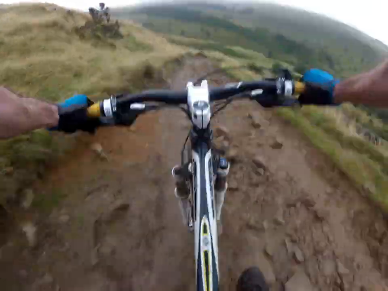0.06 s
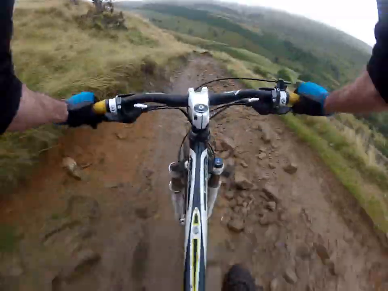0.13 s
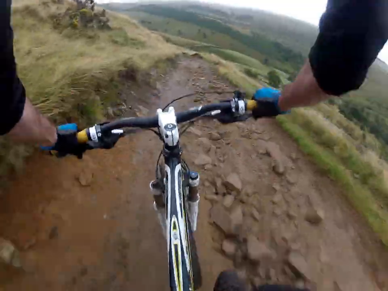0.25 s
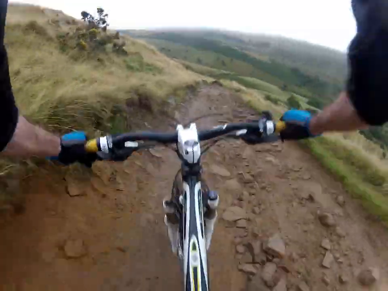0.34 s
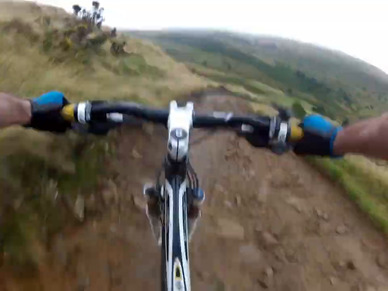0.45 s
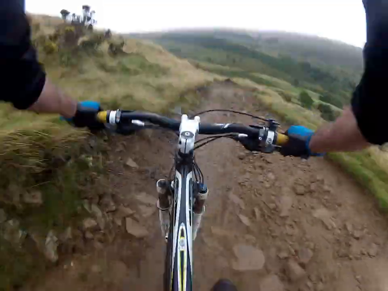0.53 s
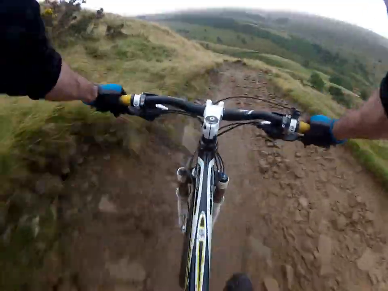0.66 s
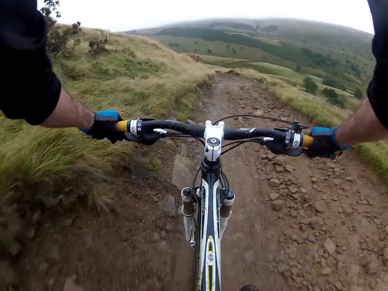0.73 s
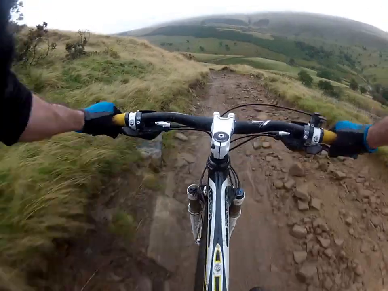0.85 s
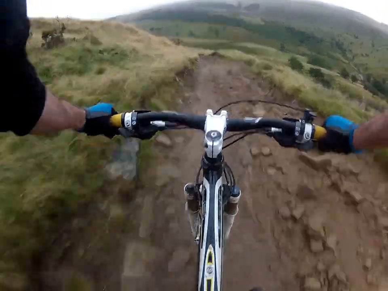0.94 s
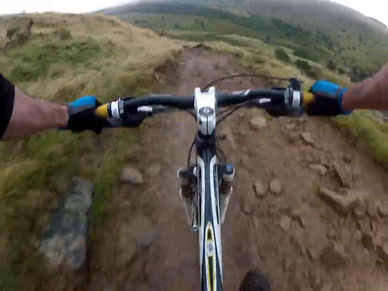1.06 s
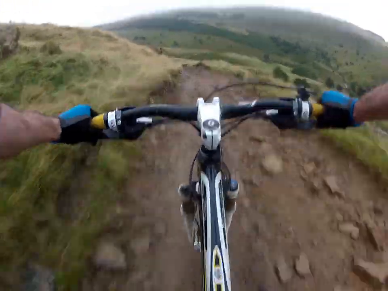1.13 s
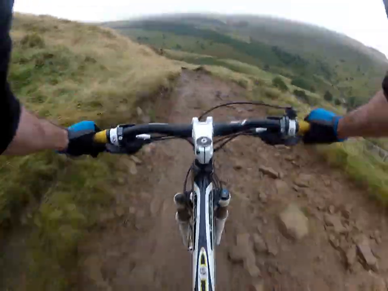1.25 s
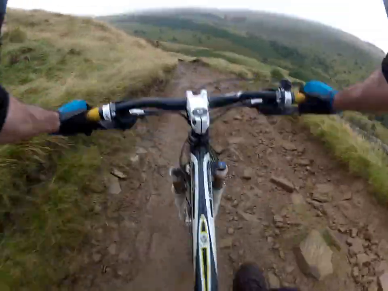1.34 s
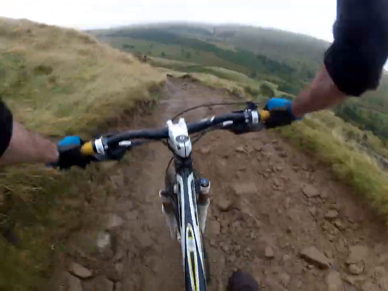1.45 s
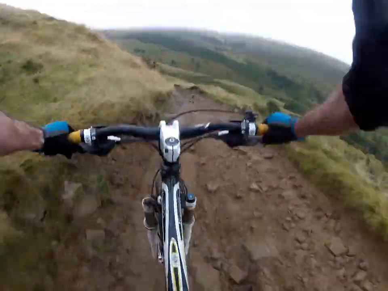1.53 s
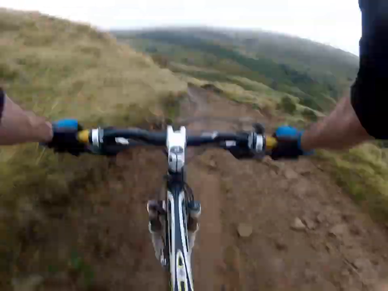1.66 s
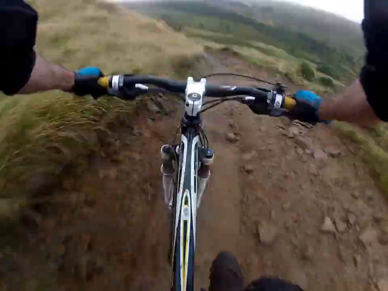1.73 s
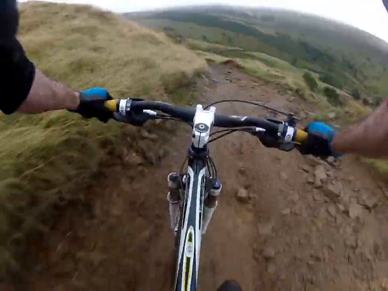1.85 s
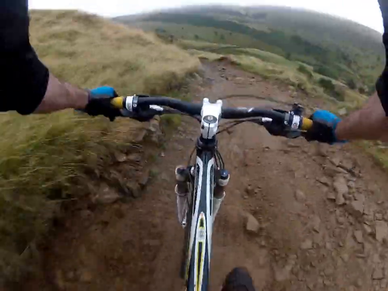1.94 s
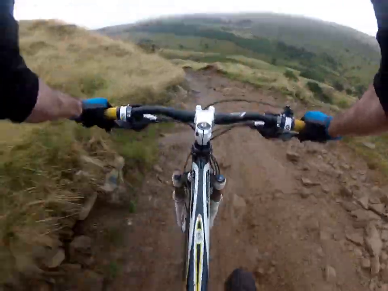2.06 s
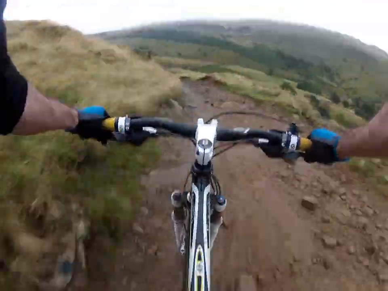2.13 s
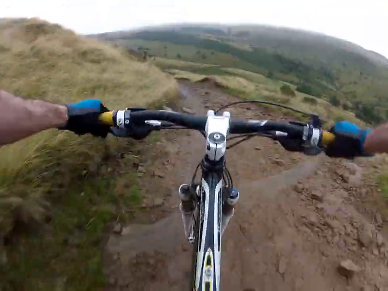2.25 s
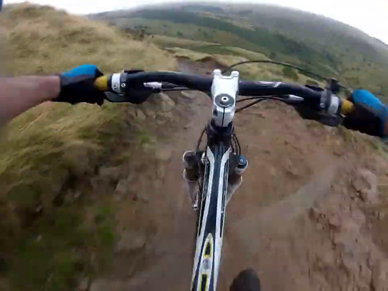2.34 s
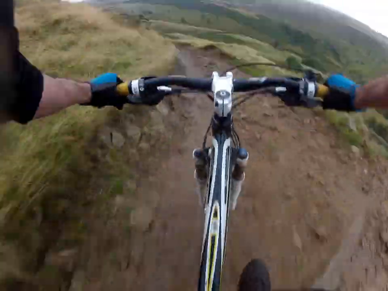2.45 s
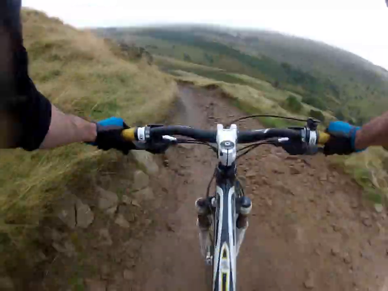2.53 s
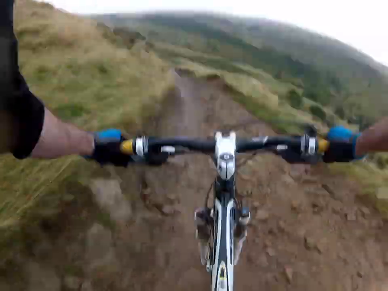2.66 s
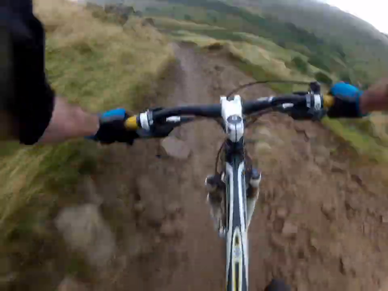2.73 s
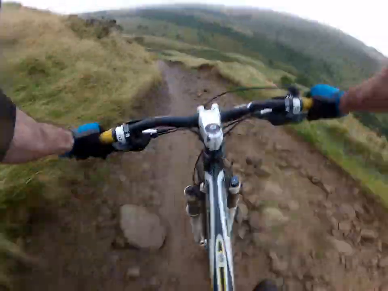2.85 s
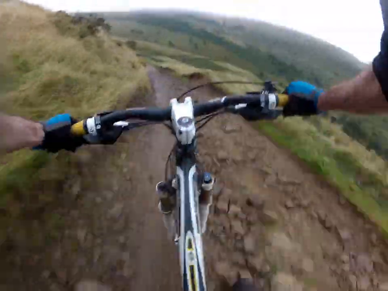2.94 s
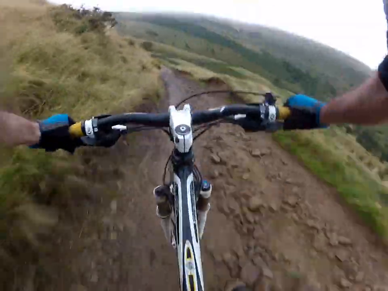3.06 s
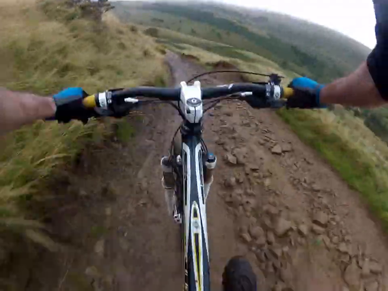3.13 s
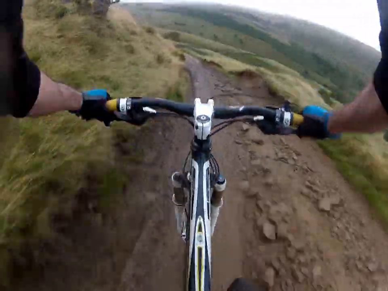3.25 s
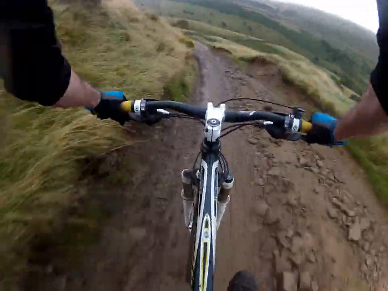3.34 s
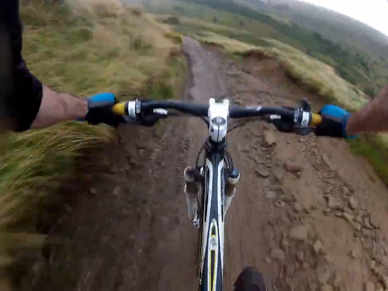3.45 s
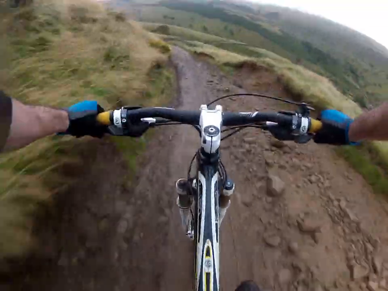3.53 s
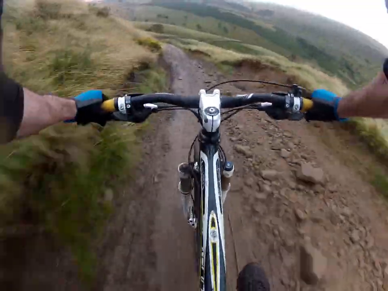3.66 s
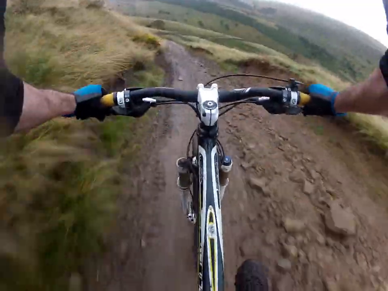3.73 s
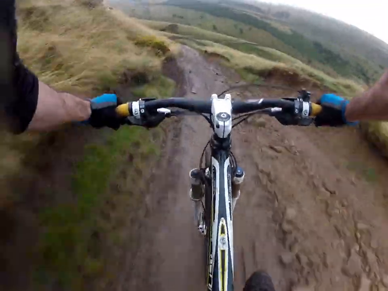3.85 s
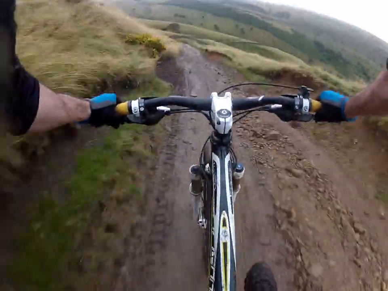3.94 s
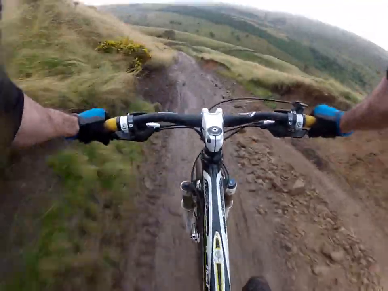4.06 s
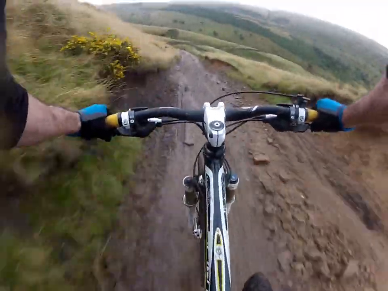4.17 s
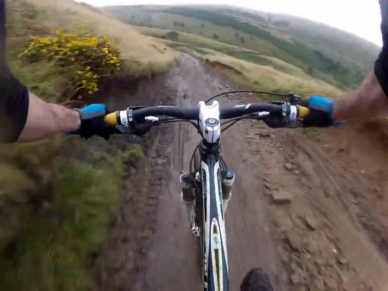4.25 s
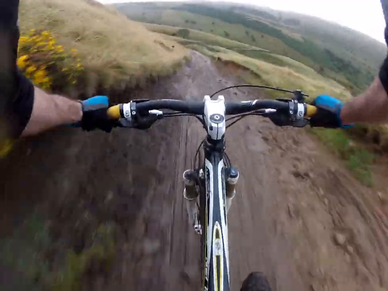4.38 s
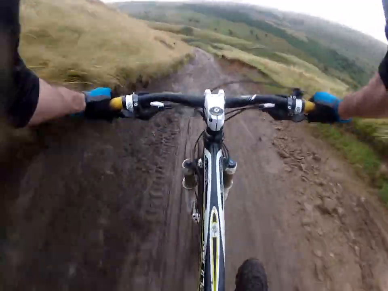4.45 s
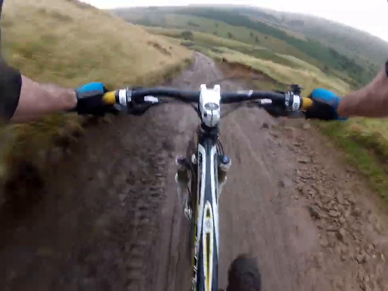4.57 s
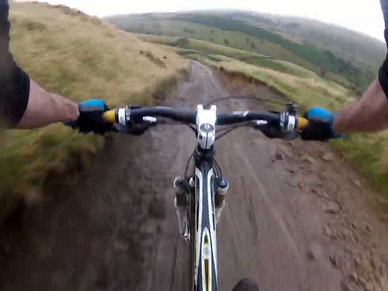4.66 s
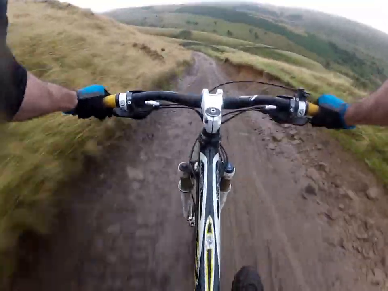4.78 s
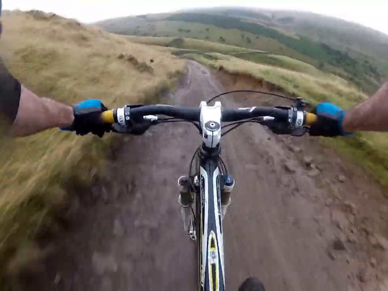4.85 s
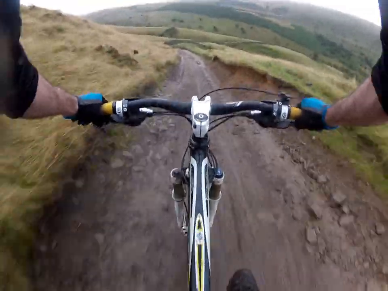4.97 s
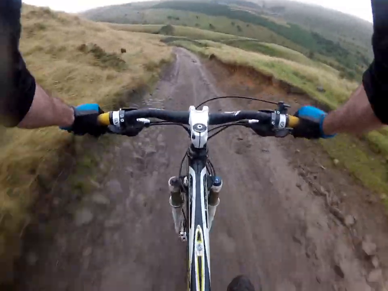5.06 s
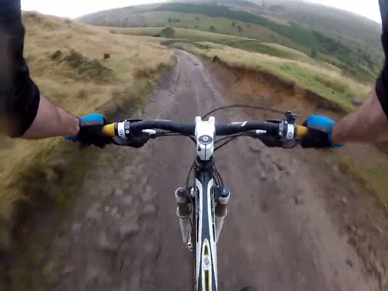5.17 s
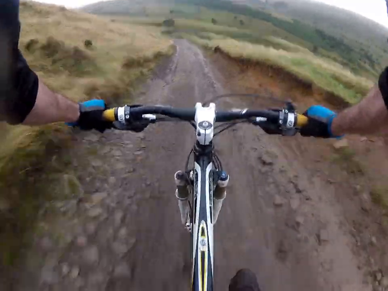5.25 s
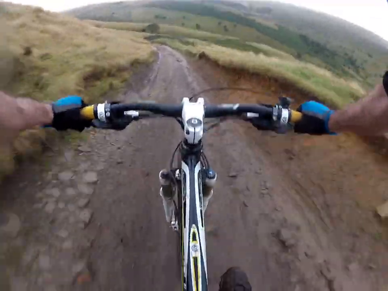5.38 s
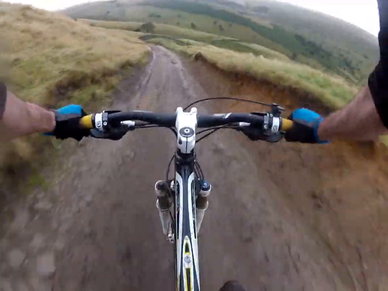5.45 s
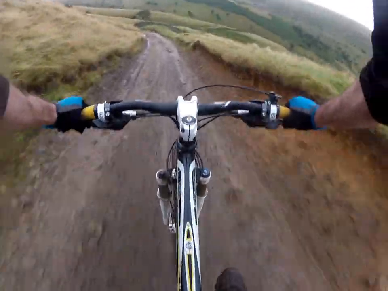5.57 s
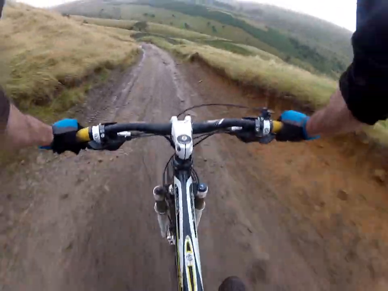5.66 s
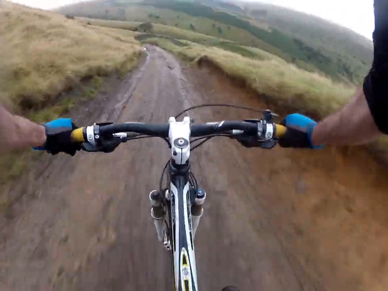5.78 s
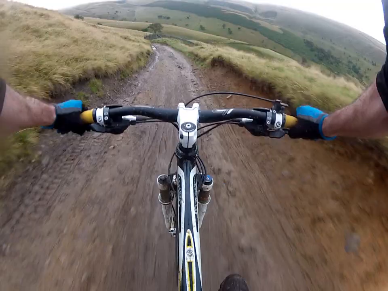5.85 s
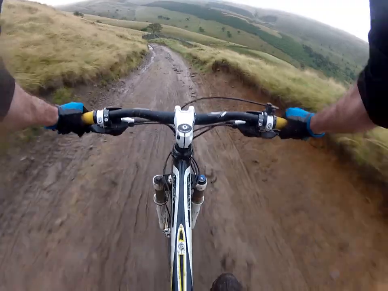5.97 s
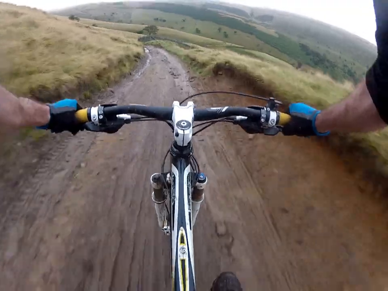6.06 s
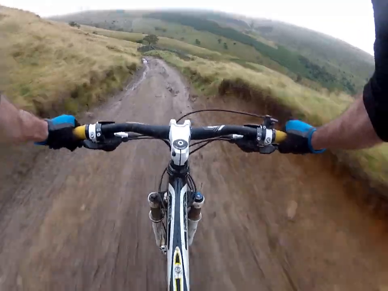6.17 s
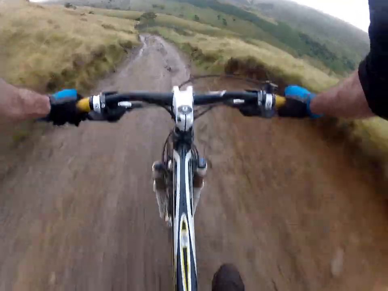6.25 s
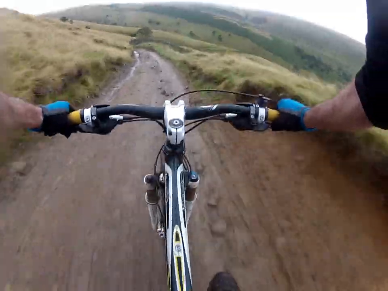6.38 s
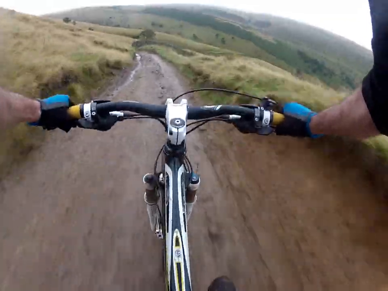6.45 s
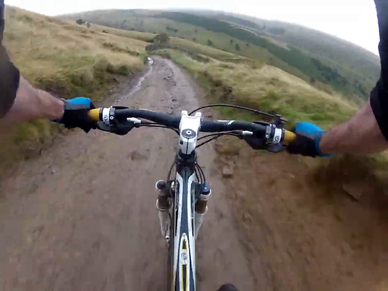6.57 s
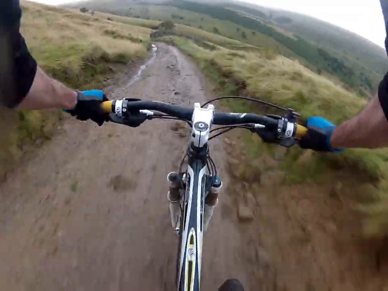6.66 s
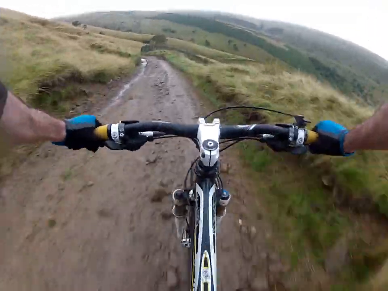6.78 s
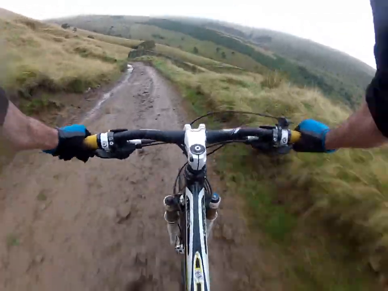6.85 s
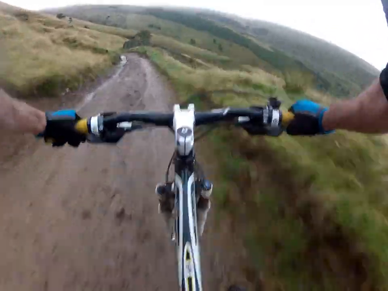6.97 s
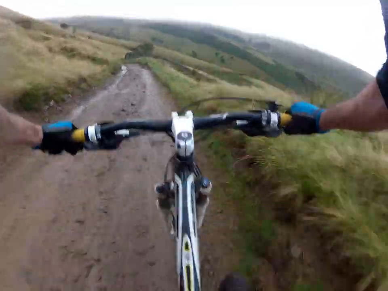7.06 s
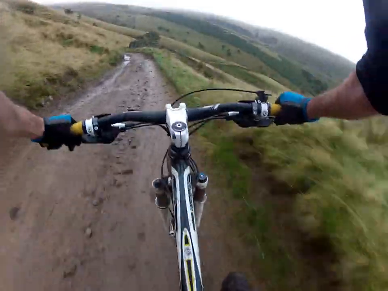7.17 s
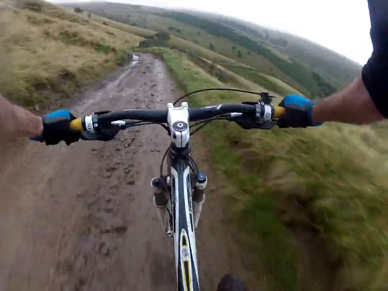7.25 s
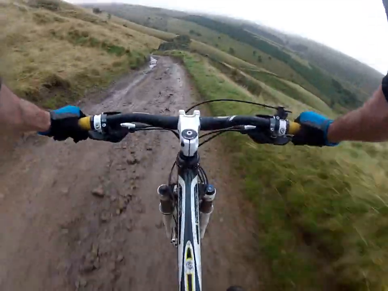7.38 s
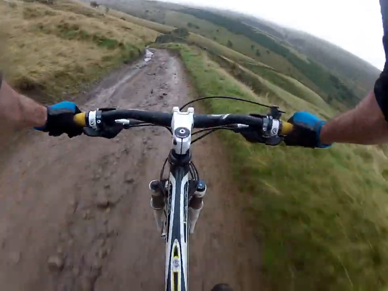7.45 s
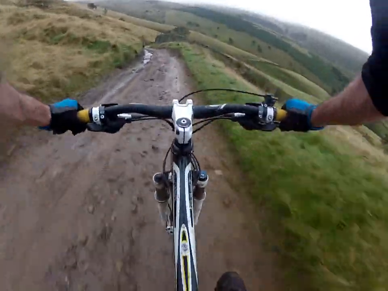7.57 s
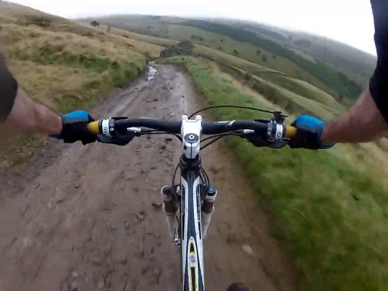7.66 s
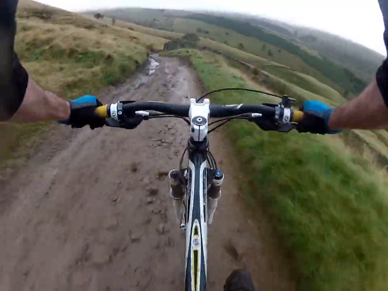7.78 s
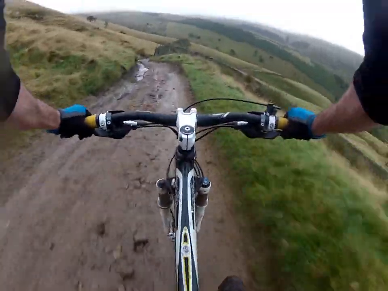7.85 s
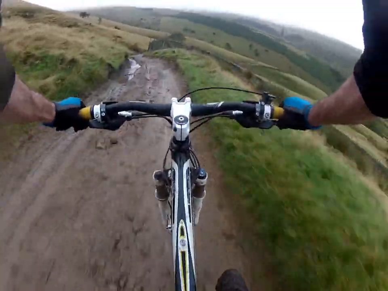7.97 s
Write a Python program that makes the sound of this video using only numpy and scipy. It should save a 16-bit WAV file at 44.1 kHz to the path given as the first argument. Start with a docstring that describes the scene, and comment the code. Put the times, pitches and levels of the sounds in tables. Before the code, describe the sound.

A bicycle races down a rocky dirt track, heard from a camera in a plastic case on the bike or rider. A hard overloaded knock opens it; dense thuds, clacks and rattles follow for nearly three seconds over crunching grit and rumbling tyres. Then the ground smooths, leaving low wind, faint tyre hiss, occasional bumps, and a couple of sharp stone clicks near the end.

```python
"""First a hard knock and a heave that overloads the microphone: a bike runs fast down a stony dirt track.
Bumps heave a camera in a plastic case (a lopsided swing of pressure) and make its mount thud (damped sines),
its shell clack (short modes) and chatter (bursts of grains). Grit crunches as filtered grains and noise;
hard parts click and pebbles snap (short decays). Filtered noise makes the wind and tyre rumble underneath;
on damp stretches the tyres hiss, and a small metal part sings faintly."""
import sys
import numpy as np
from scipy import signal
from scipy.fft import rfft, irfft, next_fast_len
from scipy.io import wavfile
from scipy.ndimage import map_coordinates

SR = 44100
rng = np.random.default_rng(int(sys.argv[2]) if len(sys.argv) > 2 else 0)


def store_wav(level_fs):
    """Save 16-bit WAV to argv[1]."""
    pcm = np.round(np.clip(np.atleast_2d(level_fs), -1, 1) * 32767)
    wavfile.write(sys.argv[1], SR, pcm.T.astype(np.int16))


N = 353241

# rocks that knock the case and then heave the camera; relative levels:
# t/s, rattle level/dB, thud level/dB, thud f/Hz, heave level/dB
ROCKS = [(.037, -22, -9, 117, 8), (0.4, -30.5, -9.5, 131, -1), (0.555, -25.5, -11, 117, -0.5),
         (.674, -23, -6, 118, 1), (.923, -28.5, -21, 166, -4.5), (1.055, -33.5, -17.5, 127, -4),
         (1.223, -25.5, -3.5, 164, 5), (1.616, -20, -8, 161, 5), (1.76, -24, -7.5, 125.5, -1),
         (2.095, -31, -12, 111, 2), (2.456, -26.5, -7.5, 127, 1.5), (2.611, -23.5, -3.5, 112, 5.5),
         (2.737, -28, -14.5, 123, 2), (3.487, -31, -17, 132, -7.5), (4.482, -37, -22, 194, -11),
         (4.61, -29.5, -15.5, 135, 0.5), (5.289, -26.5, -11, 122, -10.5), (6.257, -31, -12.5, 134, 0),
         (7.092, -30, -16.5, 176, -3.5)]
# hollows that heave the camera without a knock and press the tyres into the grit:
# t/s, relative heave level/dB, crunch level/dB
HOLLOWS = [(.822, -13, -55), (1.391, -19, -46), (1.517, -4, -39.5), (2.222, -3.5, -39), (2.353, -14, -36.5),
           (2.863, -8, -58), (2.943, -8, -56), (3.026, -5.5, -39.5), (3.166, -17, -44), (4.748, -11, -46),
           (4.961, -16.5, -46), (5.886, -14.5, -46), (6.026, -16, -45), (6.988, -4.5, -41.5),
           (7.196, -13, -70), (7.367, -15, -43)]
# source spectrum of grit and pebbles: f/Hz, relative spectral density level/dB
CRUNCH_SPECTRUM = [(150, -34), (450, -2.5), (700, 1), (1100, 2.5), (1700, 0.5), (3000, -7), (4500, -14),
                   (7000, -20), (10000, -13.5), (13000, -22.5), (15000, -16.5)]


def amp(db):
    """Level to amplitude: 20 dB is a factor of ten."""
    return 10 ** (np.asarray(db) / 20)


def unit(x):
    """Normalisation by the root mean square: scale to rms 1."""
    return x / np.sqrt(np.mean(x ** 2) + 1e-20)


def along(points, hz):
    """Interpolation on a logarithmic frequency axis, through (f/Hz, level/dB) points."""
    f, v = np.transpose(points)
    return np.interp(np.log(hz + 1), np.log(f + 1), v)


def wobble(rate):
    """Slow random modulation: a smooth curve through random knots, rate of them a second."""
    return map_coordinates(rng.standard_normal(8192), [np.arange(N) * rate / SR], mode="wrap")


def coloured(x, gain_db, size=16384):
    """Minimum-phase filtering: folding the cepstrum gives a causal filter of the given dB response."""
    log_gain = np.log(np.maximum(amp(gain_db(np.fft.rfftfreq(size, 1 / SR))), 1e-6))
    cepstrum = irfft(log_gain)
    cepstrum[1:size // 2] *= 2
    cepstrum[size // 2 + 1:] = 0
    impulse_response = irfft(np.exp(rfft(cepstrum)))
    return signal.fftconvolve(x, impulse_response)[:len(x)]


def cased(x, spectrum):
    """Source and transmission: a source spectrum is multiplied by the resonances of the case."""
    # peaks and dips of the camera case: f/Hz, width/Hz, level/dB
    resonances = [(700, 110, 2), (1070, 100, 4), (1320, 90, 4), (1570, 140, -2), (1890, 130, 7),
                  (2400, 130, 3), (3520, 300, 6), (4220, 200, -4), (4800, 330, 4), (6000, 220, -12),
                  (7150, 280, 4), (7750, 220, -3), (8480, 240, 5), (10080, 160, 7), (10430, 130, -6),
                  (10930, 150, 3), (11480, 200, -8), (12020, 130, 4), (12500, 200, -10), (13080, 130, 3),
                  (13480, 130, -5), (13880, 150, 5)]

    def response_db(hz):
        case_db = sum(db * np.exp(-((hz - centre) / width) ** 2) for centre, width, db in resonances)
        return along(spectrum, hz) + case_db

    return coloured(x, response_db)


def add(track, s, sound):
    """Superposition: mix a sound into the track from time s."""
    start = round(s * SR)
    part = sound[max(-start, 0):N - start]
    track[max(start, 0):][:len(part)] += part


def grains(rate, spread_db):
    """Shot noise: random tiny impacts of uneven size and sign, rate of them a second, rms 1."""
    sizes = amp(spread_db * np.minimum(rng.exponential(size=N), 4)) * rng.choice([-1, 1], N)
    struck = rng.random(N) < rate / SR
    return unit(sizes * struck)


def swells(rows, width):
    """Gaussian envelopes: one soft hump of amplitude at each (t/s, level/dB) row; width in s."""
    track, t = np.zeros(N), np.arange(-SR // 20, SR // 20) / SR
    for s, db in rows:
        add(track, s + t[0], amp(db) * np.exp(-(t / width) ** 2))
    return track


def ground_db():
    """Roughness of the ground drives the contact noise: a crunch level for every sample."""
    # how stony the ground is: t/s, crunch level/dB
    ground = [(0, -47.5), (.5, -45.5), (.85, -49.5), (1.2, -51), (1.6, -42.5), (1.95, -48.5), (2.35, -47.5),
              (2.62, -42.5), (3.2, -51.5), (3.75, -55.5), (4.4, -53), (4.62, -50.5), (4.9, -54),
              (6.0, -53.5), (6.7, -51), (7.0, -48), (7.25, -52), (8.0, -52)]
    return np.interp(np.arange(N) / SR, *np.transpose(ground))


def stone_patches(count=16, over_ground_db=7.5, spread_db=2.5, crunch_lead=.01):
    """Uneven excitation: loose stones at set times, in hollows and here and there: (t/s, level/dB)."""
    # patches of loose stones at set times: t/s, level/dB
    stone_places = [(.34, -42), (.415, -32), (1.28, -37), (1.665, -39.5), (1.745, -39), (1.96, -42),
                    (2.41, -44), (2.555, -34.5), (2.68, -35), (2.79, -39), (3.095, -40.5), (4.13, -46),
                    (4.39, -47.5), (5.585, -50.5), (7.035, -41.5), (7.57, -45)]
    # the grit gives way crunch_lead seconds before the bottom of a hollow
    in_hollows = [(s - crunch_lead, db) for s, _, db in HOLLOWS]
    places = ((np.arange(count) + rng.random(count)) * N / count).astype(int)
    levels = ground_db()[places] + over_ground_db + spread_db * rng.standard_normal(count)
    return list(stone_places) + in_hollows + list(zip(places / SR, levels))


def sway_hz(db):
    """Level-dependent oscillation: a heave of 0 dB swings at 33 Hz, an octave faster per 32 dB."""
    return 33 * 2 ** (db / 32)


def blows():
    """Impulsive excitation: every knock of the case, (t/s, rattle level/dB, thud level/dB, thud f/Hz)."""
    # knocks of the case on its mount without a heave; relative levels:
    # t/s, rattle level/dB, thud level/dB, thud f/Hz
    knocks_without_heave = [(.086, -36, -13.5, 110), (.136, -36.5, -19.5, 114), (.315, -41, -17.5, 151),
                            (.347, -36, -16, 167), (.51, -44, -13.5, 156), (.606, -24.5, -8.5, 137),
                            (1.161, -39, -18, 146), (1.183, -23.5, -17.5, 183), (1.243, -28.5, -29, 151),
                            (1.568, -18.5, -5, 162), (1.679, -17.5, -7, 158), (2.62, -25, -32, 175),
                            (2.745, -27, -13.5, 191), (3.42, -42, -29, 159), (5.277, -43, -26, 141),
                            (5.423, -38.5, -25.5, 148), (6.939, -27, -11, 165), (7.025, -43, -19.5, 129),
                            (7.061, -44, -23.5, 153), (7.723, -37.5, -20, 129), (7.812, -35.5, -24, 152)]
    return [(s, rattle, thud, hz) for s, rattle, thud, hz, _ in ROCKS] + list(knocks_without_heave)


def bumps(lag_cycles=0.548):
    """Inertia delays each heave after its rock; with those of the hollows: (t/s, relative level/dB)."""
    after_rocks = [(s + lag_cycles / sway_hz(db), db) for s, *_, db in ROCKS]
    return after_rocks + [(s, db) for s, db, _ in HOLLOWS]


def wind(gust_db=1.5, gusts_per_s=7):
    """Flow noise: low coloured noise of wind on the case, its level swinging quickly."""
    # spectrum of the wind: f/Hz, relative spectral density level/dB
    wind_spectrum = [(8, -17.5), (18, -4), (27, 0), (40, -20), (60, -18.5), (100, -40.5), (300, -87),
                     (1000, -120)]
    # wind on the case before the gusts: t/s, level/dB
    airflow = [(0, -29), (2.6, -27.5), (3.4, -31.5), (4.2, -28.5), (5, -33.5), (6.4, -31.5), (7.3, -28),
               (7.8, -24.5)]
    wind_db = np.interp(np.arange(N) / SR, *np.transpose(airflow)) + gust_db * wobble(gusts_per_s)
    noise = coloured(rng.standard_normal(N), lambda hz: along(wind_spectrum, hz))
    return unit(noise) * amp(wind_db)


def tyre_rumble(patches, stone_db=-1, thump_share=0.73, thump_hz=165, thump_t60=0.047):
    """Rolling contact noise: low noise and random damped thumps that swell over patches of stones."""
    # spectrum of the tyre rumble: f/Hz, relative spectral density level/dB
    rumble_spectrum = [(30, 0.5), (70, -1), (120, 3.5), (180, -9), (250, -9.5), (350, -15), (500, -28),
                       (1000, -50), (4000, -100)]
    t = np.arange(SR // 8) / SR
    mount = amp(-60 * t / thump_t60) * np.sin(2 * np.pi * thump_hz * t) * (1 - np.exp(-t / 0.00073))
    thumps = unit(signal.fftconvolve(grains(rate=16, spread_db=1.5), mount)[:N])
    noise = unit(cased(rng.standard_normal(N), rumble_spectrum))
    roll = unit(noise + thump_share * thumps)
    # -39 dB where the ground crunches at -50 dB, and 1.27 dB more for each dB of crunch
    bed = amp(-39 + 1.27 * (ground_db() + 50) + 2.5 * wobble(30))
    stones = swells(patches, width=.016)
    return roll * np.hypot(bed, amp(stone_db) * stones)


def jingle(motion):
    """Forced resonance: a small loose metal part sings faintly, as hard as the case is shaken."""
    # modes of the small metal part: f/Hz, relative level/dB, t60/s
    metal_modes = [(11838, -3, .03), (11963, 0, .05), (12036, 0, .05), (12144, -2, .03)]
    t = np.arange(SR // 10) / SR
    metal = sum(amp(level - 60 * t / t60) * np.sin(2 * np.pi * hz * t) for hz, level, t60 in metal_modes)
    shake = amp(-44) * motion * rng.standard_normal(N)
    return signal.fftconvolve(shake, metal / np.linalg.norm(metal))[:N]


def hissing(dry_db=-64, edge=.03):
    """Superposed droplet noise: damp dirt sprays off the tread, with a spit now and then."""
    # spectrum of the spray: f/Hz, relative spectral density level/dB
    hiss_spectrum = [(1000, -49), (2200, 3), (3300, 3.5), (4200, 5.5), (4900, 4), (6000, -2.5), (7200, 2),
                     (9000, -3.5), (11000, -29), (15000, -10)]
    # damp stretches of dirt where the tyres hiss: start t/s, end t/s, hiss level/dB before its flicker
    damp_stretches = [(0.31, 0.614, -54), (3.41, 3.52, -56), (4.524, 4.94, -53.5), (5.22, 5.8, -56.5),
                      (5.807, 6.5, -52.5), (7.334, 7.606, -55.5)]
    # short spits of wet grit: t/s, level/dB
    spits = [(.545, -54), (5.222, -47.5), (5.818, -48), (6.208, -37.5), (6.89, -46), (7.238, -50.5)]
    t = np.arange(N) / SR

    def onto(s):  # rolling onto a stretch takes edge seconds
        return np.clip((t - s) / edge + .5, 0, 1)

    hiss_db = dry_db + sum((db - dry_db) * (onto(start) - onto(end)) for start, end, db in damp_stretches)
    bed = amp(hiss_db + 2.7 * wobble(55) + 1.6 * wobble(10))
    spray = grains(rate=2500, spread_db=3.5) + 0.47 * rng.standard_normal(N)
    return unit(cased(spray, hiss_spectrum)) * np.hypot(bed, swells(spits, width=0.0065))


def pebbles(db=-8.0, spread_db=3.0, noise_share=1.03, t60=0.013):
    """Impact radiation: single stones snap from under the tread, louder where the ground is rough."""
    track, t = np.zeros(N), np.arange(SR // 40) / SR
    snaps = zip(rng.integers(0, N, size=170), rng.normal(0, 1, size=(170, 2)))
    for start, (strength, pitch) in snaps:
        hz = 2100 * 2 ** (0.624 * np.clip(pitch, -2, 2))  # smaller stones ring higher
        ring = np.sin(2 * np.pi * hz * t) * amp(-60 * t / .01)
        snap = ring + noise_share * rng.standard_normal(len(t)) * amp(-60 * t / t60)
        add(track, start / SR, amp(spread_db * min(strength, 2)) * snap)
    return unit(cased(track, CRUNCH_SPECTRUM)) * amp(ground_db() + db)


def crunching(patches, split_hz=1700):
    """Granular contact noise: coarse and fine grit in clumps of their own, swelling over loose stones."""
    coarse = grains(rate=500, spread_db=1.0) + 0.92 * rng.standard_normal(N)
    coarse = coloured(coarse, lambda hz: -10 * np.log10(1 + (hz / split_hz) ** 4))
    fine = grains(rate=1200, spread_db=1.5) + 1.0 * rng.standard_normal(N)
    fine = coloured(fine, lambda hz: -10 * np.log10(1 + (split_hz / (hz + 1)) ** 4))
    grit = coarse * amp(1.3 * wobble(65)) + fine * amp(1.95 * wobble(80))
    bed = amp(ground_db() - 0.2 + 1.53 * wobble(35))
    return unit(cased(grit, CRUNCH_SPECTRUM)) * np.hypot(bed, swells(patches, width=0.012))


def clicks(skirt_db=-17, crack_db=8, crack_t60=0.012):
    """Hard impact: stones and hard parts give a crack and a short noisy ring around their own pitch."""
    # stones and hard parts that click: t/s, relative level/dB, pitch f/Hz, spread/octaves, ring t60/s
    hard_parts = [(0.0997, -21.5, 3570, 0.65, 0.0072), (.162, -25, 2600, 0.42, 0.013),
                  (0.633, -23.5, 1740, 0.61, 0.014), (1.763, -25, 3700, 0.67, .012),
                  (1.807, -10.5, 1470, 0.56, 0.018), (2.3221, -21.5, 2190, 0.36, 0.015),
                  (2.749, -26.5, 3900, 0.88, .012), (4.691, -33, 3700, 0.59, 0.037),
                  (6.545, -32, 1760, 1, 0.13), (6.582, -31, 2150, 0.28, 0.029),
                  (6.6888, -6, 2850, 0.55, 0.0087), (6.7314, -13.5, 2000, 0.34, 0.023),
                  (7.635, -30.5, 1700, 0.88, 0.02), (7.88, -40.5, 3060, 1.1, .014)]
    # spectrum of the clicks: f/Hz, relative spectral density level/dB
    click_spectrum = [(300, -61), (620, -26), (980, 11.5), (1200, 10), (3300, -2.5), (4100, -6.5),
                      (5500, -1), (7200, -5.5), (9000, 2.5), (10800, 3.5), (12000, -65), (13500, 5),
                      (15000, -3)]
    track, t = np.zeros(N), np.arange(SR // 12) / SR
    for s, db, pitch_hz, spread, t60 in hard_parts:
        decay = amp(-60 * t / t60) + amp(crack_db - 60 * t / crack_t60)
        blow = rng.standard_normal(len(t)) * decay
        blow[0] += 16  # the first contact is one clean impulse

        def hump(hz):
            octaves = np.log2((hz + 1) / pitch_hz)
            return skirt_db * (1 - np.exp(-(octaves / spread) ** 2 / 2))

        click = cased(coloured(blow, hump), click_spectrum)
        early_rms = np.sqrt(np.mean(click[:SR // 300] ** 2))
        add(track, s, amp(db - 7.0) * click / early_rms)
    return track


def clacks(level_db=4, scatter_db=0.5):
    """Modal excitation: knocks ring the plastic very briefly; mode shares vary slightly at random."""
    # modes of the plastic case: f/Hz, mean relative level/dB, t60/s
    plastic_modes = [(680, -9, 0.017), (790, -11, 0.018), (1063, -1.5, 0.031), (2007, -10, 0.021)]
    track, t = np.zeros(N), np.arange(SR // 15) / SR
    for s, db, *_ in blows():
        ring = np.zeros(len(t))
        for hz, level, t60 in plastic_modes:
            mode_db = level + scatter_db * rng.standard_normal()
            ring += amp(mode_db - 60 * t / t60) * np.sin(2 * np.pi * hz * t)
        add(track, s, amp(db + level_db) * ring)
    return track


def rattles(lead=0.0078, lead_db=-12, hold=0.0052, fall=0.0041, tail=0.03, tail_db=-18, ragged_db=2.0):
    """Repeated micro-impacts: at every knock the case chatters in a short burst; powers add."""
    # spectrum of the chatter: f/Hz, relative spectral density level/dB
    rattle_spectrum = [(150, -63), (400, -1), (650, 3), (950, 5), (1300, -6), (2200, -5.5), (3200, -23.5),
                       (4600, -28.5), (7000, -36), (9000, -23), (11000, -15.5), (13000, -15), (15000, -31)]
    power, t = np.zeros(N), np.arange(-SR // 20, SR // 6) / SR
    before = amp(lead_db) * np.exp(-abs(t) / lead)  # the tyre climbs onto the stone
    after = np.exp(-np.maximum(t - hold, 0) / fall) + amp(tail_db) * np.exp(-abs(t) / tail)
    envelope = np.where(t < 0, before, after)
    for s, db, *_ in blows():
        add(power, s + t[0], (amp(db - 3.5) * envelope) ** 2)
    chatter = grains(rate=4000, spread_db=4.0) + 0.5 * rng.standard_normal(N)
    return np.sqrt(power) * amp(ragged_db * wobble(140)) * unit(cased(chatter, rattle_spectrum))


def thuds(t60=0.046, attack=0.00082, early=0.00055, glide=0.09, settle=0.0011):
    """Damped oscillator: the mount gives a few low cycles, stiffest and so highest just as it is struck."""
    track, t = np.zeros(N), np.arange(SR // 6) / SR
    for s, _, db, hz in blows():
        turn = hz * (t + glide * settle * (1 - np.exp(-t / settle)))  # phase in cycles
        thud = amp(db + 4.5 - 60 * t / t60) * np.sin(2 * np.pi * turn) * (1 - np.exp(-t / attack))
        add(track, s - early, thud)
    return track


def heaves(lag=0.00814, lead=0.079, cycles=0.47, stop_share=0.35, stop_hz=88, stop_width=0.008):
    """Inertial pressure: each bump pushes the camera down and back in one lopsided swing."""
    track, t = np.zeros(N), np.arange(-SR // 10, SR // 10) / SR
    stop = -np.cos(2 * np.pi * stop_hz * t) * np.exp(-(t / stop_width) ** 2)  # abrupt turn at the bottom
    for s, db in bumps():
        turn = sway_hz(db) * (t - lag)  # phase in cycles
        swing = np.sin(2 * np.pi * turn) * np.exp(-((turn + lead) / cycles) ** 2)
        add(track, s + t[0], amp(db - 4.0) * (swing + stop_share * stop))
    return track


def scene():
    """Linear superposition: everything reaches the one microphone inside the case."""
    patches = stone_patches()
    motion = wind() + tyre_rumble(patches) + heaves() + thuds()
    tyres = crunching(patches) + pebbles() + hissing()
    return (motion + jingle(motion) + tyres + rattles() + clacks() + clicks())[None]


def record(dry):
    """Overload and band limiting: clip at full scale, then keep nothing from 15380 Hz up."""
    clipped = np.clip(dry, -1, 1)
    size = next_fast_len(N + SR // 2)
    passband = np.fft.rfftfreq(size, 1 / SR) < 15380
    return irfft(rfft(clipped, size) * passband, size)[..., :N]


dry = scene()
out = record(dry)
store_wav(out)
```